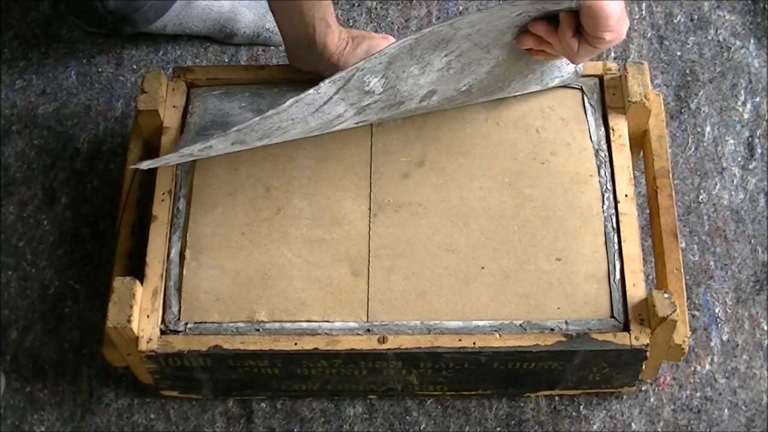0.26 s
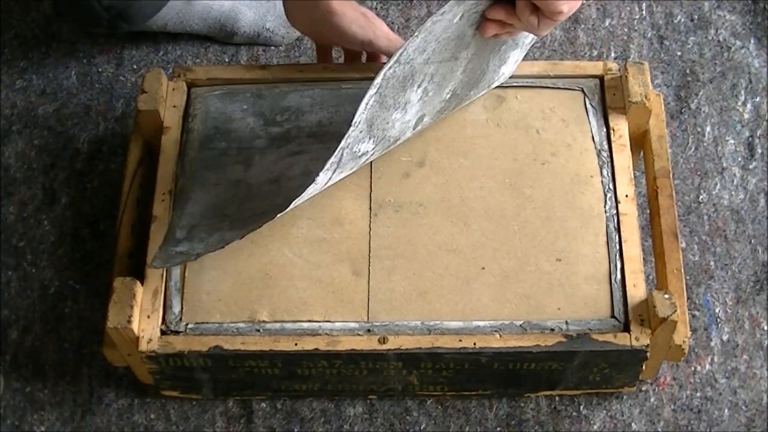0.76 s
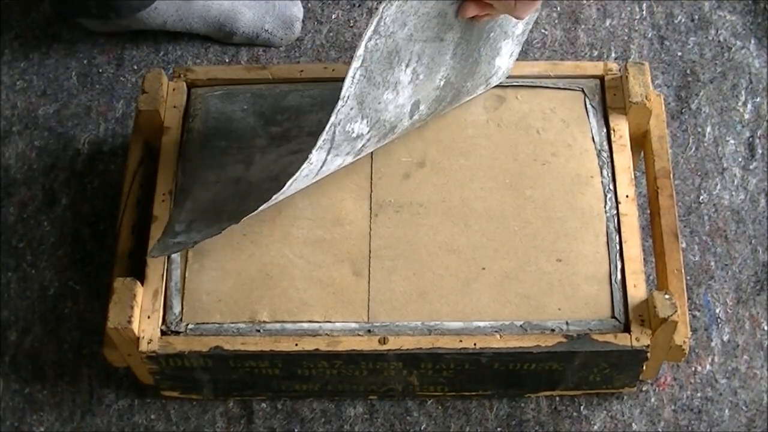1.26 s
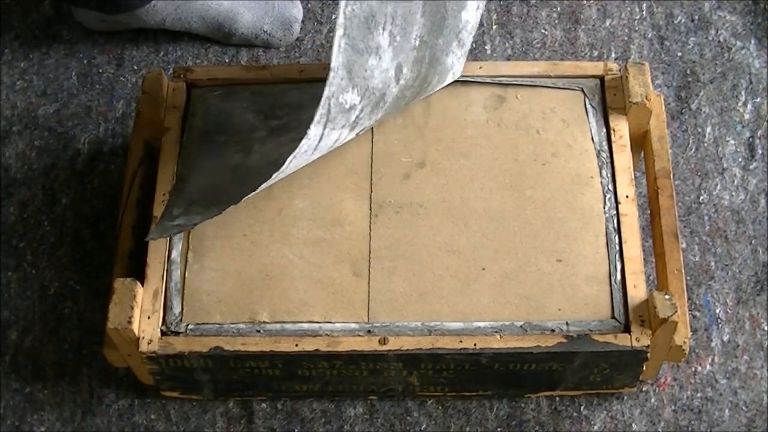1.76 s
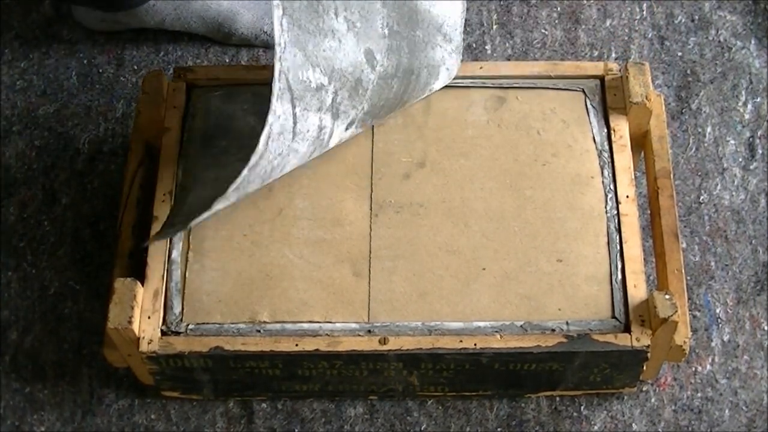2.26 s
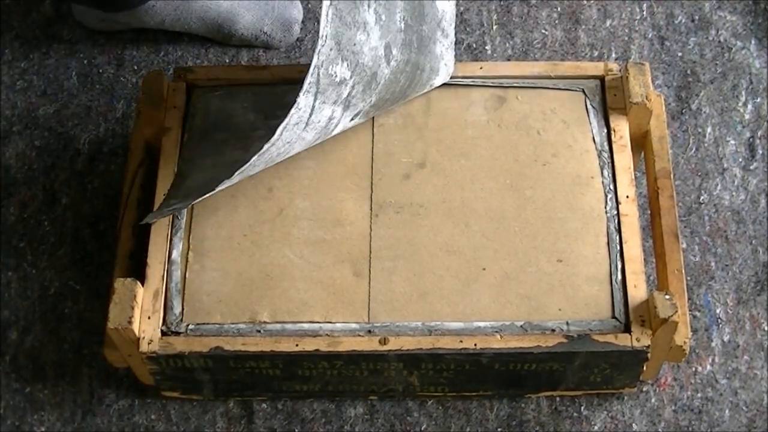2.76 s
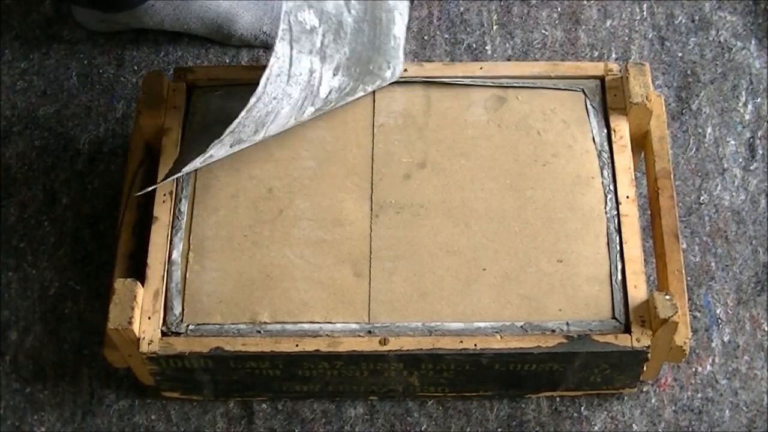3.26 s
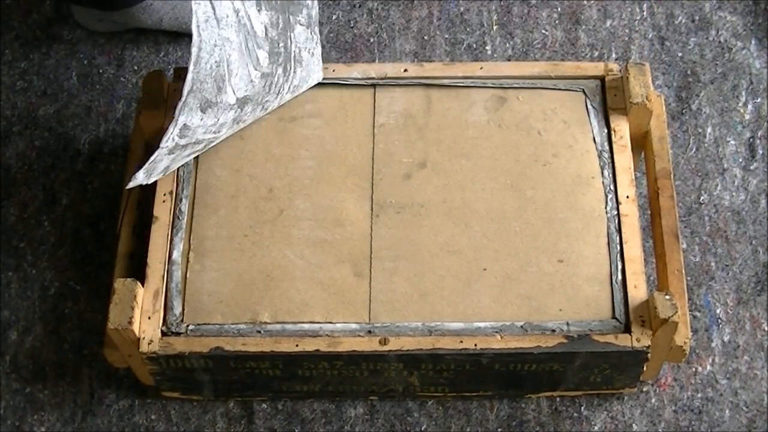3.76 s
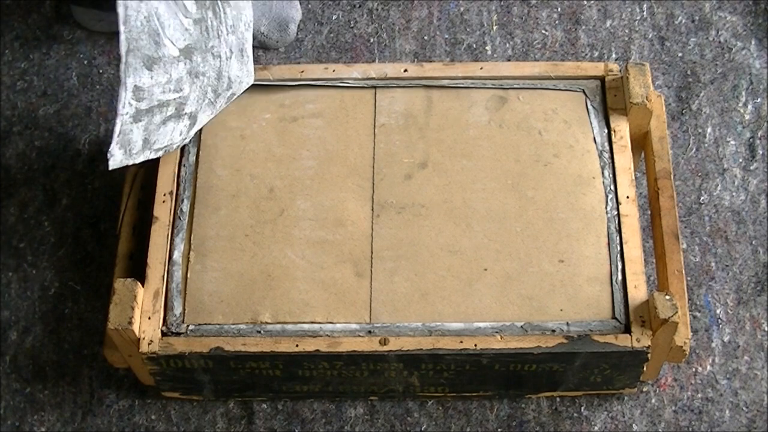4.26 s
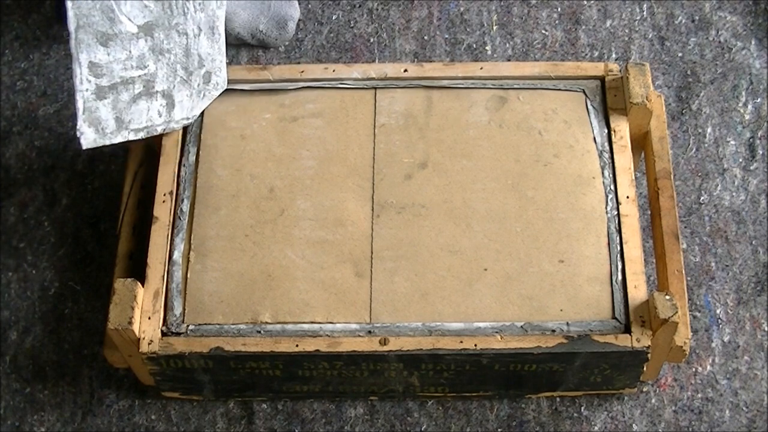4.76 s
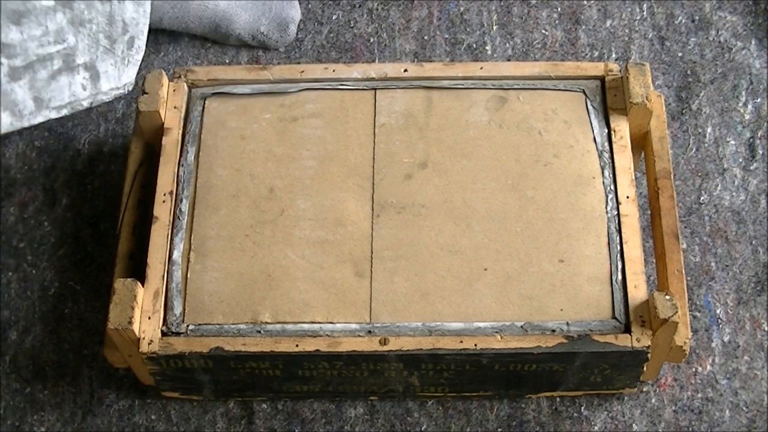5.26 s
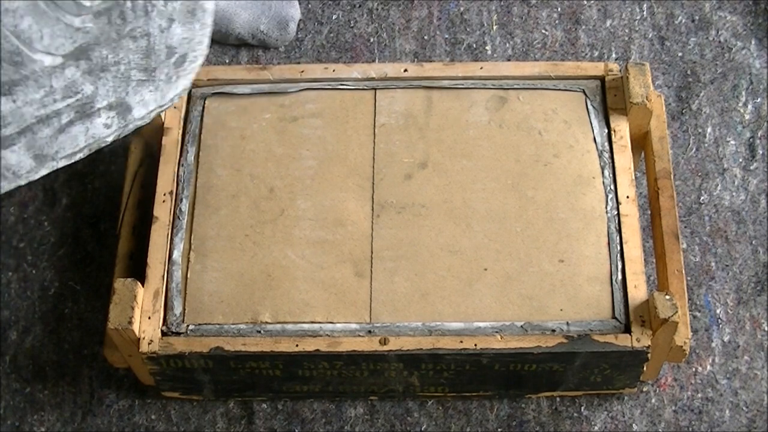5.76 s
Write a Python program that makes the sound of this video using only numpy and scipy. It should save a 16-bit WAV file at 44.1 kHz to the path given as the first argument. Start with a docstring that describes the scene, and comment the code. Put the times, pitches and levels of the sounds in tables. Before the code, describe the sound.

Close to the microphone indoors, flexible sheet metal bends and tears loose from a rim. Bright, dry clicks come singly and in quick zipping runs, each followed by a short metallic shimmer. Dull, hollow flexing booms sit underneath, and the edge rasps with brief rough groans. The loudest cracks hit with a low thump and slight overload. Activity comes in bursts separated by near stillness, with short room reflections and soft hiss.

```python
"""Peeling a metal lid off a crate

A thin sheet-metal lid is peeled back by hand from the liner of a wooden crate, indoors.
Creases pop and the seam tears in sharp clicks that ring; bending the sheet gives dull booms of filtered noise.
Random tiny slips make the edge scrape along the rim, and narrow bands of noise make it groan.
Short low thumps come as the loudest cracks overload the microphone.
A small room answers with fading noise, and still air hisses softly."""
import sys
import numpy as np
from scipy import signal
from scipy.fft import rfft, irfft
from scipy.io import wavfile
from scipy.ndimage import uniform_filter1d

SR = 44100
rng = np.random.default_rng(int(sys.argv[2]) if len(sys.argv) > 2 else 0)


def generate_wav(signal):
    """Clip the signal to [-1, 1] and save it as 16-bit WAV at the path in sys.argv[1]."""
    frames = np.transpose(np.atleast_2d(signal))
    scaled = np.clip(frames, -1, 1) * 32767
    pcm = np.round(scaled).astype(np.int16)
    wavfile.write(sys.argv[1], SR, pcm)


N = 265021  # samples in the whole scene
TAPS = 32768  # samples in one blow
HZ = np.fft.rfftfreq(TAPS, 1 / SR)  # frequencies at which gains are given
AGE = np.arange(TAPS) / SR  # seconds since a blow
TIME = np.arange(N) / SR  # seconds since the start

# how long the sheet takes to die away by 60 dB: (f/Hz, t60/s)
RING = [(150, 0.4), (500, 0.58), (1400, 0.47), (3500, 0.49), (7000, 0.45), (14000, 0.25)]


def amp(db):
    """Turns decibels into a gain."""
    return 10 ** (np.asarray(db) / 20)


def unit(x):
    """Scales to an rms of 1."""
    return x / np.sqrt(np.mean(x ** 2) + 1e-20)


def read(points, hz):
    """Reads a table at any frequency, with straight lines on a log-frequency axis."""
    f, value = np.transpose(points)
    return np.interp(np.log(hz + 1), np.log(f + 1), value)


def add(mix, s, sound):
    """Mixes a sound in at time s, in seconds."""
    part = mix[max(0, round(s * SR)):][:len(sound)]
    part += sound[:len(part)]


def colour(x, gain, size=4096):
    """Filters with the gain given on HZ, without sounding before its input does."""
    log_gain = np.log(np.maximum(gain[::TAPS // (2 * size)], 1e-5))
    circle = np.r_[log_gain, log_gain[-2:0:-1]]
    # the Hilbert transform finds the phase that makes the filter respond as early as it can
    spectrum = np.exp(np.conj(signal.hilbert(circle)))
    taps = np.fft.ifft(spectrum).real[:size]
    return signal.oaconvolve(x, taps)[:len(x)]


def tail(t60):
    """Noise for crowded modes of random phase, each band dying at its own speed; energy 1."""
    hz, t, z = signal.stft(rng.standard_normal(TAPS), SR, nperseg=256)
    decay = amp(-60 * t / read(t60, hz)[:, None])
    y = signal.istft(z * decay, SR, nperseg=256)[1][:TAPS]
    return y / np.linalg.norm(y)


def registers():
    """Shares of bass, middle and treble at each frequency, adding up to 1."""
    bass = read([(650, 1), (1300, 0.054)], HZ)
    treble = read([(3000, 0), (6500, 0.85)], HZ)
    return bass, 1 - bass - treble, treble


def sheet_gain(lift=1., lowest_hz=125):
    """The sheet's response, mean power gain 1; in the deep bass its two faces cancel."""
    # what the sheet radiates, before scaling: (f/Hz, relative level/dB)
    radiation = [(35, -50.5), (60, -47), (212, -16), (354, -6.5), (398, -8.5), (448, -3), (621, -1.5),
                 (785, 0), (2300, 0.5), (3340, -3.5), (4860, -9.5), (5860, -10), (8510, -12.5),
                 (13900, -26.5), (16000, -36)]
    # its strongest resonances, before lift scales them: (f/Hz, width/Hz, boost or cut/dB)
    resonances = [(332, 143, 8.5), (506, 42, 1.5), (646, 38, -5.5), (850, 35, -1), (886, 19, 3.5),
                  (1153, 110, 4), (1350, 27, -1.5), (1990, 22, 5), (2140, 11, 4.5), (2310, 67, 0.5),
                  (2660, 52.8, 4), (2720, 73, 0.5), (3040, 50, 4.5), (6600, 140, 3)]
    peaks_db = sum(db / (1 + (2 * (HZ - hz) / width) ** 2) for hz, width, db in resonances)
    cancelling = np.sqrt(1 + (lowest_hz / (HZ + 10)) ** 6)
    return unit(amp(read(radiation, HZ) + lift * peaks_db) / cancelling)


def crack(spread, rebound=1.0, gap=0.001041):
    """A patch pops and rebounds; treble bends travel faster, so each click is a falling chirp."""
    # gap is the typical wait for the rebound in seconds; spread sets how far the chirp is drawn out
    wait = gap * rng.uniform(0.582, 1.447)
    again = rebound * np.exp(-2j * np.pi * HZ * wait)
    chirp = np.exp(-4j * np.pi * spread * np.sqrt(HZ))
    click = irfft(chirp + again * chirp ** 1.5) * np.exp(-(AGE / .015) ** 2)
    return click / np.linalg.norm(click)


def chatter(depth_db=1.5, settle=0.077):
    """A hard-shaken sheet rattles unevenly until it settles; settle in seconds."""
    flutter = unit(uniform_filter1d(rng.standard_normal(TAPS), size=150))
    return amp(depth_db * flutter * np.exp(-AGE / settle))


def still_air():
    """Still air in the room: steady noise with its own balance of bass and treble."""
    # its balance before scaling: (f/Hz, relative level/dB)
    balance = [(18, -70), (30, -37.5), (124, -19), (157, -7.5), (584, -7), (649, -3), (702, -3.5),
               (4300, -9.5), (4650, -9), (5450, -11.5), (6900, -12), (16000, -20.5)]
    noise = colour(rng.standard_normal(N), amp(read(balance, HZ)))
    return amp(-56.5) * unit(noise)


def stroke_level(register):
    """Each stroke swells, holds and dies away; gain in the bass (0), middle (1) or treble (2)."""
    # edge moving along the rim: (start/s, rise/s, hold/s, relative level/dB, extra bass/dB, extra treble/dB)
    strokes = [(0, 0.0013, 0.004, -36, -2.5, 2.5), (0.076, 0.087, 0.031, -41.5, -7, 4.5),
               (0.27, 0.044, 0.072, -49.5, 2.5, 4), (1.825, 0.066, 0.08, -39, 2, -3),
               (2.038, 0.068, 0.1, -45.5, 7.5, 6), (2.186, 0.051, .02, -35, -14, 1.5),
               (2.243, 0.049, 0.051, -43.5, -23, 13), (2.68, 0.028, 0.0092, -39, -5.5, -1.5),
               (2.767, .02, 0.027, -47.5, -4, 5), (2.866, 0.059, 0.18, -54.5, 0, 2),
               (2.985, 0.25, 0.056, -25, -5.5, -8), (3.283, 0.083, 0.074, -29.5, 5.5, -10),
               (3.88, 0.13, 0.11, -39.5, 10, 2), (4.029, 0.061, 0.049, -28.5, 0, -3),
               (4.14, 0.058, 0.068, -33.5, 0, 1), (4.466, 0.066, 0.043, -44.5, 6, -18),
               (4.644, 0.046, 0.14, -46.5, 11, -3), (4.795, 0.047, 0.083, -41, 2, -6),
               (5.02, 0.063, 0.037, -50.5, 6, 0), (5.838, 0.015, 0.017, -44.5, 5, -14)]
    # time to die away by 60 dB in the bass, middle and treble: (t60/s)
    release = [0.45, 0.32, 0.24]
    power = np.zeros(N)
    for start, rise, hold, db, bass_db, treble_db in strokes:
        swell = np.sin(np.pi / 2 * np.clip((TIME - start) / rise, 0, 1)) ** 2
        fade_age = np.clip(TIME - start - rise - hold, 0, 2)
        fade = np.exp(-np.log(1000) * fade_age / release[register])
        level = amp(db + (bass_db, 0, treble_db)[register])
        power += (level * swell * fade) ** 2
    return np.sqrt(power)


def crinkles(per_s=60, uneven_db=4, level_db=-6, treble_db=0):
    """Tiny creases that tick at random, each one a small crack coloured by the sheet."""
    strength = amp(uneven_db * np.minimum(rng.exponential(1, N), 3))
    ticks = (rng.random(N) < per_s / SR) * strength
    ticks = signal.oaconvolve(ticks, crack(spread=0.0342))[:N]
    return amp(level_db) * colour(unit(ticks), sheet_gain() * amp(treble_db * registers()[2]))


def bend(x, depth_db):
    """As the sheet's curve changes, groups of modes swell and fade."""
    z = signal.stft(x, nperseg=512, noverlap=384)[2]
    # random levels, smoothed over neighbouring frequencies and then over time
    patches = uniform_filter1d(rng.standard_normal(z.shape), size=3, axis=0)
    patches = unit(uniform_filter1d(patches, size=22, axis=1))
    y = signal.istft(z * amp(depth_db * patches), nperseg=512, noverlap=384)[1][:N]
    return unit(y) * np.std(x)


def drag(slips_per_s=1100, uneven_db=3, rub=0.49, ring_db=-2, level_db=-1, judder_db=1.27):
    """Tiny slips of the edge on the rim set the sheet hissing and ringing."""
    strength = amp(uneven_db * np.minimum(rng.exponential(1, N), 4))
    slips = (rng.random(N) < slips_per_s / SR) * rng.choice([-1, 1], N) * strength
    # the edge catches and lets go every few milliseconds
    judder = amp(judder_db * unit(uniform_filter1d(rng.standard_normal(N), size=260)))
    force = judder * (unit(slips) + rub * rng.standard_normal(N))
    ringing = signal.oaconvolve(force, tail(RING))[:N]
    force = unit(force + amp(ring_db) * ringing)
    scrape = bend(colour(force, sheet_gain(lift=1.1)), depth_db=2.5) + crinkles()

    out = np.zeros(N)
    for register, share in enumerate(registers()):
        band_filter = np.fft.fftshift(irfft(share))
        # dropping the first half filter length keeps the band in time
        part = signal.fftconvolve(scrape, band_filter)[TAPS // 2:][:N]
        out += part * stroke_level(register)
    return amp(level_db) * out


def room(x, delay=.006):
    """The walls' diffuse answer: fading noise after a short delay in seconds."""
    # time for the room to die away by 60 dB: (f/Hz, t60/s)
    wall_decay = [(150, 0.64), (1000, 0.19), (4000, 0.16), (14000, 0.068)]
    out = np.zeros(N)
    add(out, delay, signal.oaconvolve(x, tail(wall_decay))[:N])
    return out


def pops(uneven_db=1.2, fade_db=2.2):
    """Lists every snap: the single creases, then each tear unzipping at its own pace."""
    # single creases popping:
    # (t/s, relative energy/dB, extra bass/dB, extra treble/dB, ring against crack/dB, crease's own pitch f/Hz)
    creases = [(.1798, 1, -8.5, 7.5, -2.5, 6650), (.428, 13.5, 2.5, 1, -4.5, 1630),
               (.4776, 0.5, 0.5, 1, 1, 2580), (.6852, 3, -37, 7, -4, 2930), (.84, -27.5, 9, -1, 20.5, 9800),
               (1.4114, -2, -10, -13, 2.5, 2300), (1.4709, 12, -4.5, -5, 0.5, 2400),
               (1.513, 10, -1, -5, -1, 2570), (1.5805, 5, 1, -4, -3.5, 2370),
               (1.598, -1.5, 0.5, -4, 4.5, 1290), (1.7054, 6.5, -5, -1, 1.5, 2050),
               (1.7129, 9, -0.5, -3.5, 1.5, 1930), (2.085, -9.5, -29, 4.5, 3, 7940),
               (2.6932, -26, -17, 10, 13.5, 2776), (3.2486, 13.5, -31, -1, -5, 2470),
               (3.3013, 6.5, -7, 3, 2, 2520), (3.3044, 6, -4.5, 7, 2, 2000), (3.325, -3.5, 2, -1, -4, 2760),
               (3.335, 8.5, -8, -4, -1, 2860), (3.4812, 7.5, 0.5, 6.5, 0.5, 3500),
               (3.4851, 7, 1, 1.5, -3, 5700), (3.825, -16.5, 4, 2, 8.5, 11000),
               (4.0747, -18, -9, 7.5, 12.5, 7540), (4.3227, -16, 3, 1, 4.5, 1200),
               (4.3983, -17.5, -14, 3, .5, 9700), (4.4946, -8.5, -36, 11, -2.5, 2540),
               (4.7085, -14, -4, 5, 6, 7520), (4.72, -3, -0.5, 12, 0.5, 13300),
               (4.7771, -2, -18, 7.5, -2, 13060), (4.9769, -8.5, 1.5, -0.5, 5.5, 1670),
               (5.062, -27, -1, 20, 2, 12000), (5.138, -30, -3, 20, 8, 2140),
               (5.1679, 13, -4, -2, 1.5, 2740), (5.1706, 2, -11, 6, -7, 2760),
               (5.1833, 3, -9, -20, 7, 1260), (5.8491, -19.5, -3, 2, 12, 1000)]
    # the seam tearing in a quick run of snaps: (start/s, length/s, gap/s, relative energy/dB,
    # extra bass/dB, extra treble/dB, ring against crack/dB, pitch f/Hz)
    tears = [(0.134, .03, 0.017, -25, -2, 13, -7, 9150), (0.4397, .077, 0.0086, 4.5, -6, -2.5, -1.5, 2920),
             (0.591, .037, .0155, -1, -29, 6, -1, 3320), (2.1376, .04, .0163, 4.5, -37, 10.5, 3.5, 3100),
             (3.375, .048, .0137, -3, -7, 7, 6.5, 3200), (4.739, .027, .018, -12, -2, 5, 2.5, 2980)]
    rows = list(creases)
    for start, length, gap, db, *timbre in tears:
        for age in np.arange(0, length, gap):
            # a tear weakens as it runs, with some chance in each snap
            snap_db = db - fade_db * age / length + uneven_db * rng.standard_normal()
            rows.append((start + age, snap_db, *timbre))
    return rows


def snaps(spread=0.03528, crack_db=0, echo_db=-9, early_db=-5, ring_db=-4, early_time=0.008, echo_time=0.0066,
          hump_db=5, hump_octaves=0.43, peak_db=6, sharpness=10, trim_db=-3):
    """Each snap: a crack, its echoes from the sheet's edges, then the ring of the whole sheet."""
    out = np.zeros(N)
    bass, _, treble = registers()
    near, ringing = sheet_gain(lift=0.47), sheet_gain(lift=0.37)
    fade_times = np.array([[echo_time], [early_time]])  # seconds
    for s, db, bass_db, treble_db, share_db, hz in pops():
        click = crack(spread * rng.uniform(0.862, 1.231))
        echoes, early = rng.standard_normal((2, TAPS)) * np.exp(-AGE / fade_times)
        direct = amp(crack_db) * click + amp(echo_db) * echoes / np.linalg.norm(echoes)
        ring = amp(early_db) * early / np.linalg.norm(early) + amp(ring_db) * tail(RING)
        # the popping patch favours a band set by its size, and rings at the middle of that band
        octaves = np.log2((HZ + 1) / hz)
        hump = hump_db / (1 + (octaves / hump_octaves) ** 2)
        tilt = amp(trim_db + bass_db * bass + treble_db * treble + hump)
        peak = amp(peak_db / (1 + (sharpness * octaves) ** 2))
        direct = colour(direct, near * tilt)
        ring = colour(ring * chatter(), ringing * tilt * peak)
        add(out, s, amp(db) * (direct + amp(share_db) * ring))
    return out


def flexes(low_hz=260, slope=4.42, low_db=2, knock=0.52, knock_time=0.0018):
    """A broad buckle is a soft blow: it stirs mainly the modes below its top edge."""
    # the sheet buckling as a whole: (t/s, relative level/dB, top edge f/Hz, swell/s, t60/s)
    buckles = [(.409, -33.5, 1400, 0.0011, 0.096), (.45, -27.5, 2400, 0.013, 0.45),
               (.809, -35.5, 1260, 0.0013, 0.25), (1.384, -48, 2720, .0022, .22),
               (1.706, -23, 2000, 0.0026, 0.31), (1.761, -34.5, 2150, 0.0031, 0.67),
               (1.957, -29.5, 1583, 0.0003, .19), (3.183, -26, 1090, 0.0022, 0.26),
               (3.765, -31.5, 1660, .004, 0.32), (3.871, -34.5, 1410, .015, 0.27),
               (3.896, -25.5, 1580, 0.0013, 0.31), (4.975, -32, 1920, 0.0016, 0.21),
               (5.142, -35.5, 2400, 0.0092, 0.23), (5.169, -25.5, 1260, 0.0071, 0.66),
               (5.207, -20, 1840, 0.03, .47), (5.631, -49, 695, 0.031, 0.44),
               (5.668, -29.5, 1110, 0.0035, 0.48), (5.705, -31.5, 1400, 0.02, 0.34)]
    out = np.zeros(N)
    for s, db, edge_hz, swell, t60 in buckles:
        # as the sheet lifts off, its two faces cancel more: the bass edge climbs from 90 Hz by 24 Hz a second
        body = sheet_gain(lift=0.23, lowest_hz=90 + 24 * s) * amp(low_db / (1 + (HZ / low_hz) ** 2))
        softness = np.sqrt(1 + (HZ / edge_hz) ** (2 * slope))
        shaken = rng.standard_normal(TAPS) * chatter(depth_db=1.5, settle=.15)
        modes = unit(colour(shaken, body / softness))
        decay = np.exp(-np.log(1000) * np.maximum(AGE - swell, 0) / t60)
        shape = np.minimum(AGE / swell, 1) * decay
        # the start of the buckle is a little louder
        add(out, s, amp(db) * modes * shape * (1 + knock * np.exp(-AGE / knock_time)))
    return out


def thumps(rise=0.0005):
    """Low thumps as the loudest cracks overload the microphone: no ring, a peak after rise seconds."""
    # when they come and how strong they are: (t/s, peak level/dB)
    peaks = [(0.429, -29.5), (1.471, -31), (3.481, -50), (5.166, -77)]
    out = np.zeros(N)
    u = AGE / rise
    for s, db in peaks:
        add(out, s, amp(db) * u * np.exp(1 - u))
    return out


def groans():
    """Friction feeds one resonance of the bent sheet, which swells and fades as a rough tone."""
    # rubbing that catches a resonance: (start/s, length/s, pitch f/Hz, width/Hz, level before the swell/dB)
    rubs = [(2.961, .2, 1160, 100, -40), (3.084, .26, 7300, 600, -46), (3.138, 0.11, 345, 60, -34),
            (3.198, .08, 2390, 380.2, -26), (3.948, .2, 8900, 1400, -52), (4.155, .18, 7700, 610, -45.5),
            (4.174, 0.49, 580, 129.6, -63), (4.45, .22, 313, 59.4, -52), (4.675, 0.15, 288, 50.76, -52),
            (4.778, 0.18, 350, 70, -43.5)]
    out = np.zeros(N)
    for s, length, hz, width, db in rubs:
        resonance = 1 / (1 + ((HZ - hz) / width) ** 2) ** 2
        tone = unit(irfft(rfft(rng.standard_normal(TAPS)) * resonance))
        swell = np.hanning(round(length * SR))
        add(out, s, amp(db) * unit(tone[:len(swell)]) * swell)
    return out


def scene(room_db=-11):
    """Adds up the lid, the room's answer to it, the low thumps and the still air."""
    lid = snaps() + flexes() + drag() + groans()
    mix = lid + amp(room_db) * room(lid) + thumps() + still_air()
    return mix[None]


def record(dry):
    """The loudest cracks overload the microphone; then a filter takes off the highest treble."""
    clipped = dry / (1 + dry ** 12) ** (1 / 12)
    low_pass = signal.firwin(255, 16100, window=("kaiser", 8), fs=SR)  # cutoff in Hz
    return signal.oaconvolve(clipped, low_pass[None], "same")


dry = scene()
out = record(dry)
generate_wav(out)
```